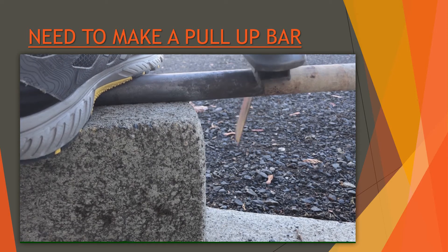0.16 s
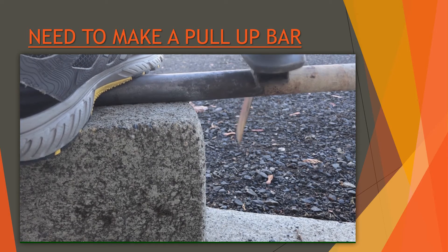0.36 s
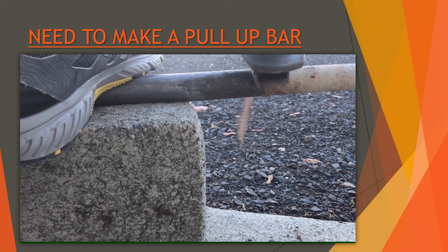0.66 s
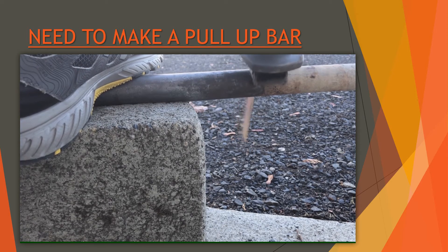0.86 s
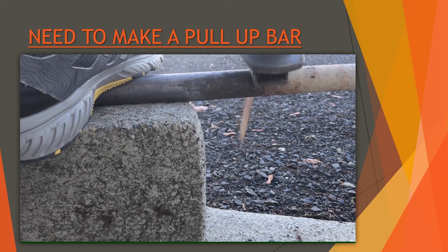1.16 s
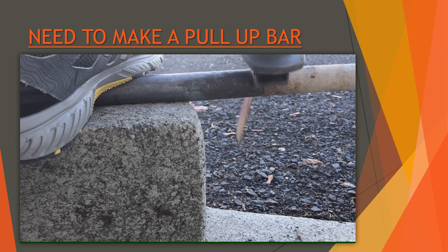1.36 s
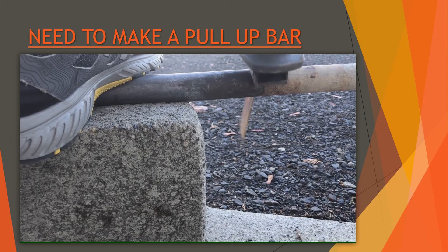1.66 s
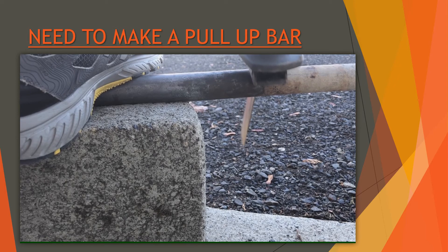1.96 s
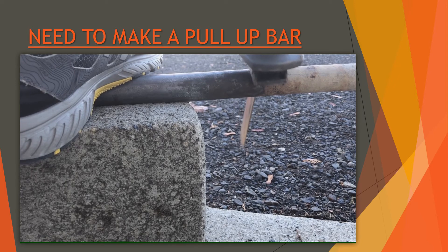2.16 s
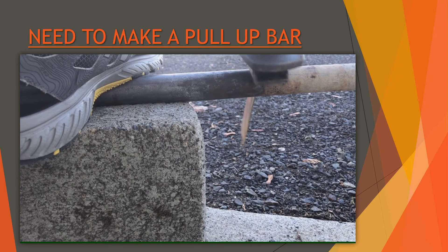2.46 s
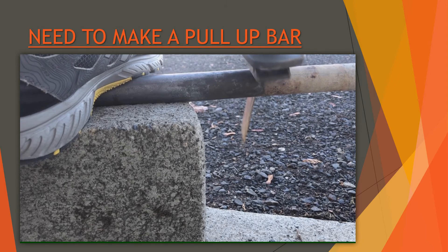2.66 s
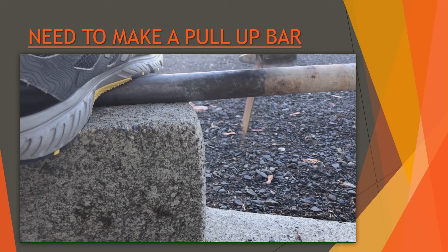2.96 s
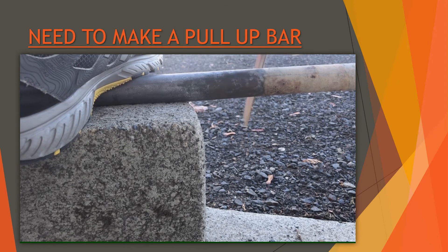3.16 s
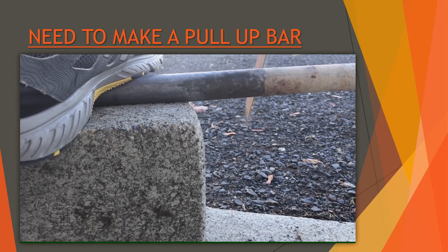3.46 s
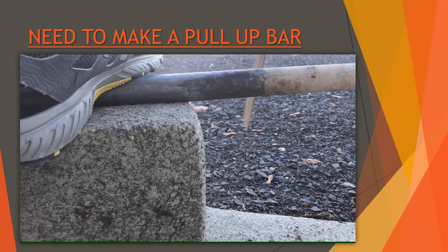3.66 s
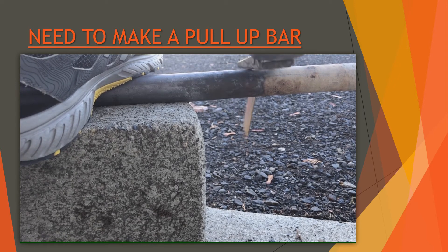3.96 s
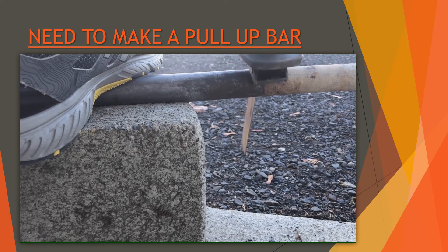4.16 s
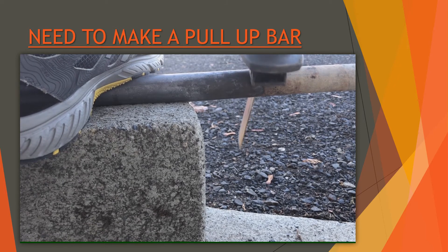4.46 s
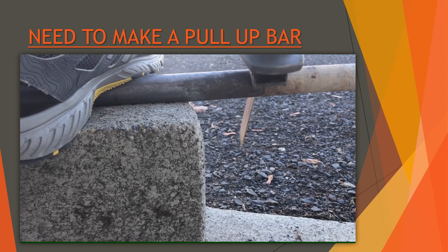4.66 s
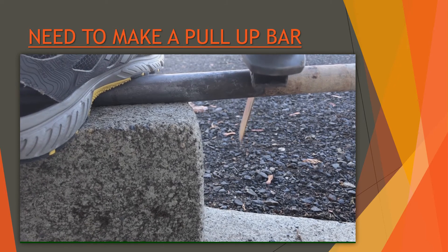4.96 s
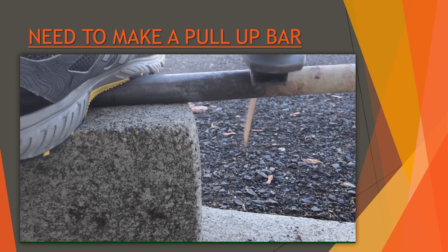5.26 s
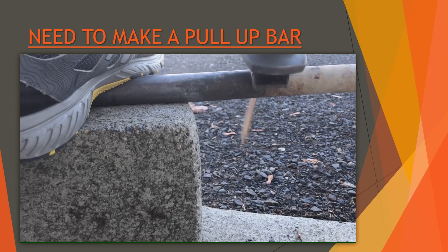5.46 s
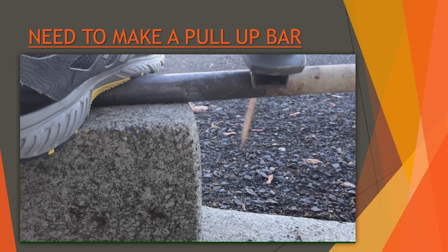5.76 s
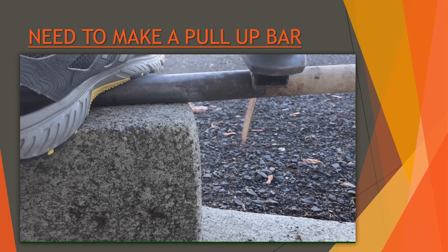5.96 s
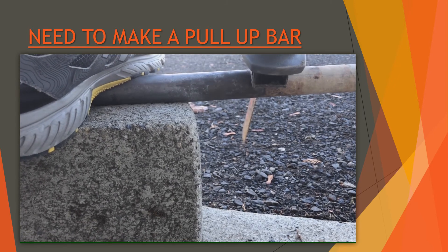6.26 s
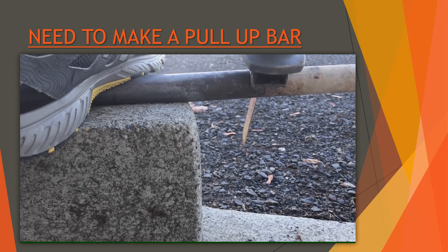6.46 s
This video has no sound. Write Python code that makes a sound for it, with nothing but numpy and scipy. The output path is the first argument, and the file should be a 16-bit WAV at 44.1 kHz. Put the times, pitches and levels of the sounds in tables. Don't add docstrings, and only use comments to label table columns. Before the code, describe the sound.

A reciprocating saw jolts up to speed and rasps harshly through steel pipe for over five seconds, then stalls into small metallic taps and a scrape.

```python
import sys
import numpy as np
from scipy import signal
from scipy.fft import rfft, irfft, next_fast_len
from scipy.io import wavfile
from scipy.ndimage import uniform_filter1d

SR = 44100
rng = np.random.default_rng(int(sys.argv[2]) if len(sys.argv) > 2 else 0)


def voltage_ratio(level):
    return 10 ** (np.asarray(level, float) / 20)


def digitize_waveform(pressure):
    field = np.atleast_2d(pressure).T
    bounded = np.clip(field, -1, 1)
    quanta = np.round(bounded * 32767).astype(np.int16)
    wavfile.write(sys.argv[1], SR, quanta)


N = 291501

UP_S = 0.33
RELEASE_S, STALL_S = 5.7, 5.76


def in_time(rows):
    s, *columns = np.transpose(rows)
    return [np.interp(np.arange(N) / SR, s, c) for c in columns]


def at_hz(points, hz):
    points_hz, level_db = np.transpose(points)
    return np.interp(np.log(hz + 1), np.log(points_hz), level_db)


def rms_one(x):
    return x / np.sqrt(np.mean(x ** 2) + 1e-20)


def colour(x, spectrum):
    size = next_fast_len(N)
    hz = np.arange(size // 2 + 1) * SR / size
    return rms_one(irfft(rfft(x, size) * voltage_ratio(at_hz(spectrum, hz)), size)[:N])


def drift(rate_hz):
    r = np.exp(-2 * np.pi * rate_hz / SR)
    return rms_one(signal.lfilter([1], [1, -2 * r, r * r], rng.standard_normal(N + SR))[SR:])


def ring(x, hz, t60):
    r, w = voltage_ratio(-60 / (t60 * SR)), 2 * np.pi * hz / SR
    return signal.lfilter([0, np.sin(w)], [1, -2 * r * np.cos(w), r * r], x + 1e-18)


def chips(per_s, spread_db):
    sizes = voltage_ratio(spread_db * np.minimum(rng.exponential(1, N), 5)) * rng.standard_normal(N)
    return rms_one(sizes * (rng.random(N) < per_s / SR))


# pitch_hz, level_db (per Hz)
YARD_SPECTRUM = [(20, -12), (50, 2.5), (124, -6), (424, -16.5), (1240, -20), (1600, -23.5), (3300, -25.5),
                 (5000, -30), (12000, -38), (15800, -43)]
# pitch_hz, level_db (rms)
HUM = [
    (59.2, -79),
    (113.0, -77.5),
]


def yard():
    t = np.arange(N) / SR
    rumble = voltage_ratio(-64.5 + 1.3 * drift(25)) * colour(rng.standard_normal(N), YARD_SPECTRUM)
    return rumble + sum(voltage_ratio(db + 3) * np.sin(2 * np.pi * hz * t) for hz, db in HUM)


# time_s, push_db, bite of the pull (0-1), looseness of the shoe_db, freedom of the pipe_db
GRIP = [(.32, -1, .25, -1.5, 0), (.55, -0.5, 0.21, -10, -4.5), (.85, 0, 0.27, -8.5, -6.5),
        (1.1, 1, 0.2, -13, -7), (1.5, 0, 0.2, -7.5, -8), (1.8, 0, 0.34, -5.5, -6.5),
        (2.1, 0.5, 0.24, -11, 2), (2.35, -1, 0.37, -14, 0.5), (2.8, -0.5, 0.3, -18.5, -7),
        (3.2, -1, 0.17, -10, 5), (3.55, -2, .16, -10, 4), (3.75, -2, .16, -9, -5),
        (4.05, -2.5, 0.17, -3.5, -6), (4.4, -2, 0.28, 0.5, -2), (4.7, 0.5, 0.42, -4.5, 1),
        (5, -0.5, .32, 0.5, 2), (5.3, -2, 0.38, 1.5, 2), (5.72, -1, 0.31, 5, 4)]


def grip():
    return in_time(GRIP)


# time_s, speed_strokes_per_s
CRANK = [(0, 11.3), (.1, 11.3), (.19, 14.14), (.33, 32.49), (.53, 33.33), (.83, 34.05), (1.58, 30.52),
         (1.98, 31.24), (2.26, 28.98), (2.72, 29.95), (2.93, 30.9), (3.88, 32.64), (4.32, 30.08),
         (4.76, 28.63), (5.13, 24.41), (5.43, 28.97), (5.68, 27.9), (5.85, 5.46)]


def crank():
    t = np.arange(N) / SR
    turns = -.653 + np.cumsum(in_time(CRANK)[0]) / SR
    bite = np.clip(grip()[1], 0, 1) + 0.088 * (t > RELEASE_S)
    biting = np.clip((t - .275) / .02, 0, 1) * (t < CRANK[-1][0])
    return 2 * np.pi * turns, bite * biting


def run_up():
    hump_s, blend_s = .0055, 0.12
    turns, speed = crank()[0] / (2 * np.pi), in_time(CRANK)[0]
    blend = np.clip((UP_S - np.arange(N) / SR) / blend_s, 0, 1)
    gain = 1
    for turn, hump_db in ((0.01, 15.5), (.38, 7)):
        apart_s = ((turns - turn + .5) % 1 - .5) / speed
        gain = gain + (voltage_ratio(hump_db * blend) - 1) * np.exp(-.5 * (apart_s / hump_s) ** 2)
    return gain


def catch():
    strength, start_turn, fade_turns, spread_db = 1.5, -.12, .13, 5
    angle, bite = crank()
    turns = angle / (2 * np.pi) - start_turn + 1.25
    luck = rng.standard_normal((200, 2))
    which = turns.astype(int)
    since = turns - which - .25 - .05 * np.clip(luck[which, 0], -2, 2)
    force = voltage_ratio(spread_db * np.minimum(luck[which, 1], 1.5))
    return 1 + strength * bite * force * (since > 0) * np.exp(-np.abs(since) / fade_turns)


def stroke(sharp, lag, back, flutter_db):
    angle, bite = crank()
    turn, depth = angle - lag, sharp * bite
    force = np.exp(depth * (np.cos(turn) + back * np.cos(2 * turn + 1.1))) / np.sqrt(1 + depth ** 2)
    chatter = drift(70)
    return force * voltage_ratio(flutter_db * (chatter - uniform_filter1d(chatter, size=SR // 20)))


def tooth_train(humps):
    return chips(12000, 1.4) * stroke(sharp=1.115, lag=0.25, back=0.19, flutter_db=1.39) * humps


RING_HZ = [148, 483, 930, 1291, 1807, 2110, 2975, 3380, 4440, 5638, 6060, 6880, 7942, 5140, 8200]
# width_hz, level_db
RINGS = [(14, -20), (44.95, -27), (44.3, -19), (71.8, -22.5), (53.2, -12.5), (119.5, -16.5), (116, -9),
         (40, -10.5), (70, -15.5), (40, -13), (100, -15), (48, -17.5), (88, -14), (81, -18), (90, -23.5)]
# drive_db, change_db_per_s, share of looseness, share of freedom
KERF = [
    (-0.5, 0.16, 1.01, .01),
    (-2.5, -0.01, -0.19, 1),
    (-3.5, 0.83, 0.13, .9),
    (1.5, .1, -0.12, 0.13),
    (-1.5, 0.83, 0.17, .01),
]


def metal_rings(hammer):
    t, (_, _, loose_db, free_db) = np.arange(N) / SR, grip()
    rings = []
    for hz, (width_hz, level_db) in zip(RING_HZ, RINGS):
        tone = rms_one(ring(np.gradient(hammer), hz, 1.9 / max(width_hz, hz / 140)))
        rings.append(voltage_ratio(level_db + 2.8 * drift(4)) * tone)
    for k, (db, slope, loosened, freed) in zip((0, 4, 5, 7, 9), KERF):
        rings[k] = rings[k] * voltage_ratio(db + slope * t + loosened * loose_db + freed * free_db)
    rings[7] = rings[7] * np.clip(t / (2 * UP_S), 0, 1)
    return rings


# pitch_hz, level_db (per Hz)
THUMP_SPECTRUM = [(24, -55), (40, -20.5), (108, -18), (151, 0), (197, 2), (277, 9.5), (372, 2), (500, 4),
                  (650, -29.5), (1100, -120)]


def shoe_thump(hammer, casing):
    shoe = chips(6000, 1.1) * stroke(sharp=0.37, lag=-.2, back=3.2, flutter_db=1.6)
    knock = colour(shoe * np.sqrt(run_up()) + .2 * hammer, THUMP_SPECTRUM)
    return knock + 4 * casing * np.clip(np.arange(N) / SR / UP_S, 0, 1) ** 2


# pitch_hz, level_db (per Hz)
BODY_SPECTRUM = [(210, -34.5), (350, -15), (472, -6), (570, -7), (844, 0.5), (912, 1.5), (1260, 5.5),
                 (1590, -2.5), (1850, -7.5), (2460, -9), (2700, -7), (3510, -34.5), (5940, -120)]


def pipe_body(hammer, low_rings):
    boom = voltage_ratio(-17 + grip()[2]) * rms_one(ring(np.gradient(hammer), 670, 0.02))
    return colour(hammer, BODY_SPECTRUM) + sum(low_rings) + boom


# pitch_hz, level_db (per Hz)
TEETH_SPECTRUM = [(1180, -31.5), (2000, 4), (2460, -4), (3010, 0), (3200, 2.5), (3400, 5.5), (3680, 3),
                  (5810, -1.5), (7600, -17.5), (9880, -43.5), (16700, -120)]


def teeth(hammer, high_rings):
    return colour(hammer, TEETH_SPECTRUM) + sum(high_rings)


def whine(whirr):
    t, out = np.arange(N) / SR, 0
    for hz, level_db, db_per_s in ((10800, -10.5, -2), (11700, -23, 2.14)):
        out = out + voltage_ratio(level_db + db_per_s * t) * rms_one(ring(np.gradient(whirr), hz, .006))
    return out


# pitch_hz, level_db (per Hz)
FAN_SPECTRUM = [(3800, -14.5), (6500, -1), (7300, -1.5), (8300, 3.5), (9200, 2.5), (10000, -3.5),
                (12000, -4.5), (13200, -3.5), (15000, -9), (15800, -6)]


def fan(hammer, humps):
    whirr = chips(30000, 0.95) * stroke(sharp=0.71, lag=-.1, back=.15, flutter_db=2.5) * humps
    return colour(.5 * hammer + whirr, FAN_SPECTRUM) + whine(whirr)


# level_db, change_db_per_s as the kerf deepens, share of push, share of looseness
LAYERS = [
    (-31, -0.44, .3, 0.33),
    (-15, 0, 1.01, 0.013),
    (-17, -0.64, 1.01, .01),
    (-18.5, -0.32, 0.46, 0.0089),
]
# standstill_loss_db, stall_drop_db, fade_db_per_s, tail_db under the cut, tail_fade_db_per_s
ENDS = [
    (4.5, -0.5, 318, 30, 120),
    (16.5, 9, 415, 35.5, 98),
    (15, 8, 450, 39, 90),
    (20, 7, 1500.5, 46.5, 200),
]


def levels():
    switch_s, switch_db = .0135, 11
    jolt_db, jolt_fade_s = 8, 0.017
    t, (push_db, _, loose_db, _) = np.arange(N) / SR, grip()
    late = np.maximum(t - STALL_S, 0)
    stalling = np.clip((t - RELEASE_S) / (STALL_S - RELEASE_S), 0, 1)
    start_db = np.where(t < switch_s, switch_db, -jolt_db * np.exp(-np.abs(t - switch_s) / jolt_fade_s))
    out = []
    for (db, db_per_s, pushed, loosened), (idle_db, stall_db, fade, tail_db, tail_fade) in zip(LAYERS, ENDS):
        cut_db = db + db_per_s * t + pushed * push_db + loosened * loose_db
        up_db = idle_db * np.clip(1 - t / UP_S, 0, 1) + start_db
        down_db = stall_db * stalling + fade * late
        out.append(voltage_ratio(cut_db - up_db) * np.hypot(voltage_ratio(-down_db), voltage_ratio(-tail_db - tail_fade * late)))
    return out


def shake():
    rise_s, seated_db = 0.23, -7
    t, angle = np.arange(N) / SR, crank()[0]
    loose_db = np.maximum(grip()[2] - seated_db, 0)
    running = np.clip((t - UP_S) / rise_s, 0, 1) * np.clip((STALL_S - t) / (STALL_S - RELEASE_S), 0, 1)
    low = np.sin(2 * angle) + np.sin(3 * angle + 1) + voltage_ratio(-2) * np.sin(4 * angle + 2)
    high = np.sin(5 * angle) + voltage_ratio(-6) * np.sin(6 * angle + 1) + voltage_ratio(-5) * np.sin(7 * angle + 2)
    return np.sqrt(2) * running * (voltage_ratio(-55.5 - 1.2 * loose_db) * low + voltage_ratio(-47 - .1 * loose_db) * high)


def saw():
    humps = run_up() * catch()
    hammer = tooth_train(humps)
    rings = metal_rings(hammer)
    layers = (shoe_thump(hammer, rings[0]), pipe_body(hammer, rings[1:6]),
              teeth(hammer, rings[6:]), fan(hammer, humps))
    noise = sum(gain * rms_one(x) for x, gain in zip(layers, levels()))
    return signal.sosfilt(signal.butter(4, 125, "high", fs=SR, output="sos"), noise) + shake()


def struck(at, blow_db, pitches, modes):
    out, chance = 0, rng.normal(0, 1.9, (len(at), len(modes)))
    for k, (hz, (level_db, t60)) in enumerate(zip(pitches, modes)):
        clicks = np.zeros(N)
        clicks[at] = voltage_ratio(blow_db + level_db + chance[:, k])
        out = out + ring(clicks, hz, t60)
    return out


PIPE_HZ = [1265, 1804, 2252, 3382, 4285, 5110, 5400, 6300, 7450, 8300]
# level_db, t60_s
PIPE = [(-19, .1), (1, .125), (-6, .09), (-10, .085), (-9, .09), (-18, .12), (-17, .06), (-15, .04),
        (-21, .04), (-19, .03)]
CLAMP_HZ = [4420, 7700, 9200, 10500, 11750, 14900]
# level_db, t60_s
CLAMP = [(-5, .05), (-7, .04), (1, .045), (-3, .04), (-4, .04), (-6, .035)]
# start_s, pipe_db, clamp_db, crack_db, crack dullness (0-1)
TAPS = [(5.788, -62, -70, -38, .9), (5.806, -59, -68, -38, 0.8), (5.826, -60, -70, -45, .8),
        (5.955, -92, -70, -76.5, .3), (5.978, -90, -66, -78, 0.4), (6.05, -91, -78, -72, 0.08),
        (6.114, -66, -80, -49, 0.57), (6.128, -72, -57.5, -62, .4), (6.169, -74, -90, -58, .85),
        (6.304, -43.5, -70, -42, 0.63), (6.327, -68, -85, -54, 0.97), (6.382, -90, -87, -65, .2),
        (6.425, -87.5, -85, -63, .2), (6.46, -90, -88, -70, .05), (6.572, -74, -85, -61, 0.6),
        (6.603, -90, -85, -66, .05)]


def taps():
    start_s, pipe_db, clamp_db, crack_db, dull = np.transpose(TAPS)
    at = np.round(start_s * SR).astype(int)
    out = struck(at, pipe_db, PIPE_HZ, PIPE) + struck(at, clamp_db, CLAMP_HZ, CLAMP)
    cracks = np.exp(-np.arange(300) / (.003 * SR)) * rng.standard_normal((len(at), 300))
    for i, crack, db, pole in zip(at, cracks, crack_db, np.clip(dull, 0, .95)):
        out[i:i + 300] += voltage_ratio(db) * np.sqrt(1 - pole ** 2) * signal.lfilter([1], [1, -pole], crack)
    return signal.sosfilt(signal.butter(2, 280, "high", fs=SR, output="sos"), out)


def blade_drag():
    grit_s, drag_s, drag_length_s = 5.98, 6.113, .104
    t = np.arange(N) / SR
    grit = colour(chips(6000, 2.5), [(700, -28), (1500, -1.0), (5000, -0.5), (12000, -3), (16000, -15)])
    drag = np.clip(np.minimum(t - drag_s, drag_s + drag_length_s - t) / .006 + .5, 0, 1)
    faint = voltage_ratio(-78 + 3.5 * drift(12)) * np.clip((t - grit_s) / .1, 0, 1)
    return grit * (voltage_ratio(-68) * drag + faint)


# start_s, level_db, pitch_hz
SQUEAKS = [
    (6.17, -54, 1000),
    (6.115, -58, 740),
    (6.515, -62, 3250),
]


def squeaks():
    out, t = np.zeros(N), np.arange(1500) / SR
    for start_s, level_db, hz in SQUEAKS:
        tone = np.sin(2 * np.pi * hz * t) * np.minimum(t / 0.0017, 1) * np.exp(-t / .007)
        out[round(start_s * SR):][:1500] += voltage_ratio(level_db) * tone
    return out


def scene():
    return (yard() + saw() + taps() + blade_drag() + squeaks())[None]


STARVED = [3, 11, 12, 15, 19, 50, 72, 103, 111, 112, 128, 137, 141, 164, 170, 179, 181, 192, 199, 201, 207,
           208, 210, 217, 227, 231, 240]
# pitch_hz, step_db over the frame's rms line
COARSE_STEP = [(200, 15.5), (700, 12), (1200, 16.5), (3500, 12.5), (4500, 10), (12000, 9.5), (16000, 9.5)]


def starve(x):
    hop, grid = 1024, 393
    n, k = np.arange(2 * hop) + .5, np.arange(hop) + .5
    window = np.sin(np.pi * n / (2 * hop))
    basis = window[:, None] * np.cos(np.pi / hop * np.outer(n + hop / 2, k))
    starts = grid + hop * np.array(STARVED)
    lines = x[starts[:, None] + np.arange(2 * hop)] @ basis
    step = voltage_ratio(at_hz(COARSE_STEP, k * SR / (2 * hop))) * lines.std(axis=1, keepdims=True)
    kept = np.sign(lines) * step * np.floor(np.abs(lines) / step + .4)
    out = x.copy()
    for i, lost in zip(starts, (lines - kept) @ basis.T * 2 / hop):
        out[i:i + 2 * hop] -= lost
    return out


def top_cut(x):
    return signal.sosfilt(signal.butter(12, 16400, fs=SR, output="sos"), x)


def record(dry):
    x = dry[0] / (1 + (dry[0] / .74) ** 4) ** .25
    x = signal.sosfilt(signal.butter(2, 60.0, "high", fs=SR, output="sos"), x)
    x = signal.sosfilt(signal.ellip(10, .5, 80, 15680, fs=SR, output="sos"), starve(x))
    return top_cut(x[None])


dry = scene()
out = record(dry)
digitize_waveform(out)
```